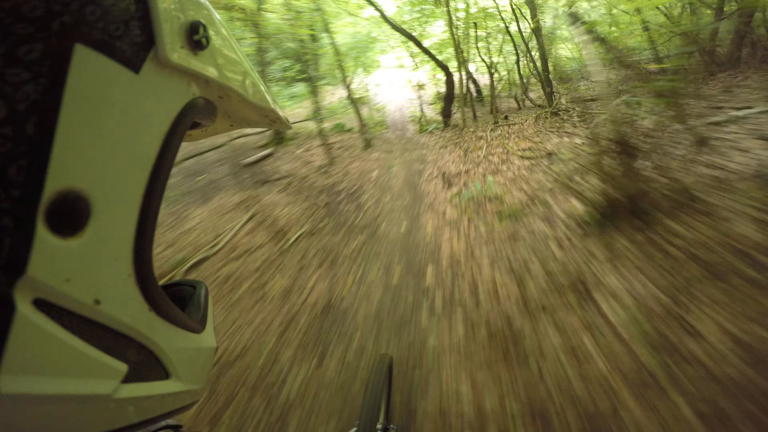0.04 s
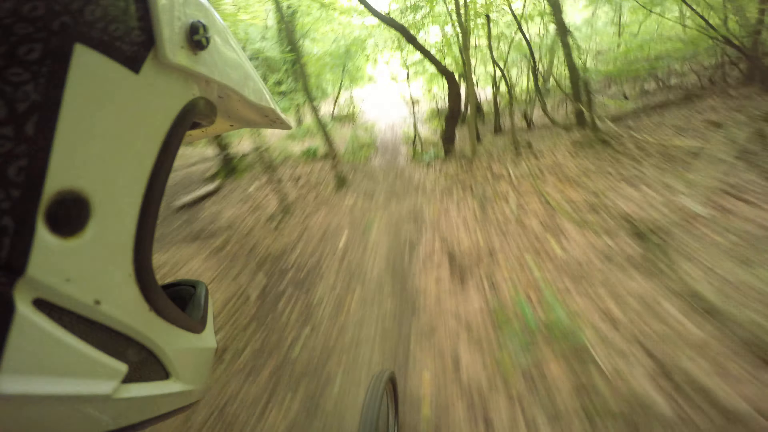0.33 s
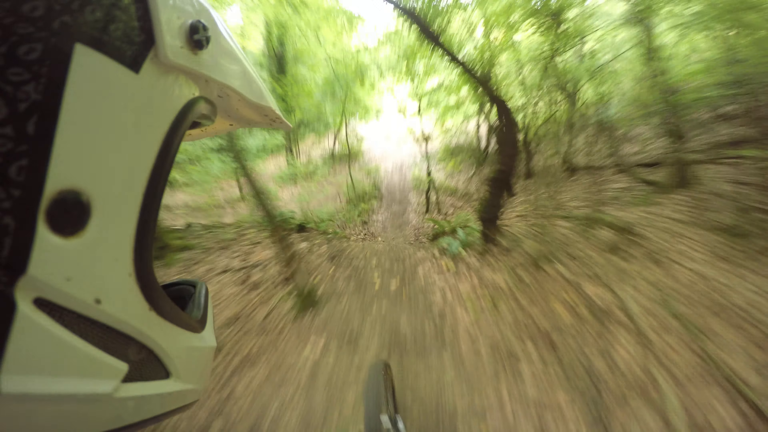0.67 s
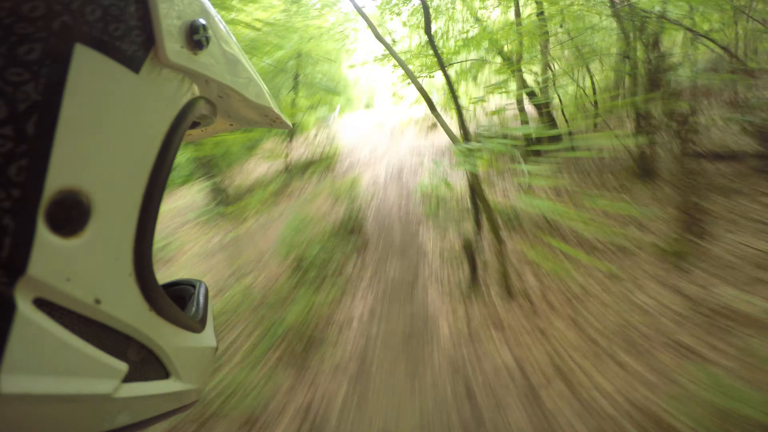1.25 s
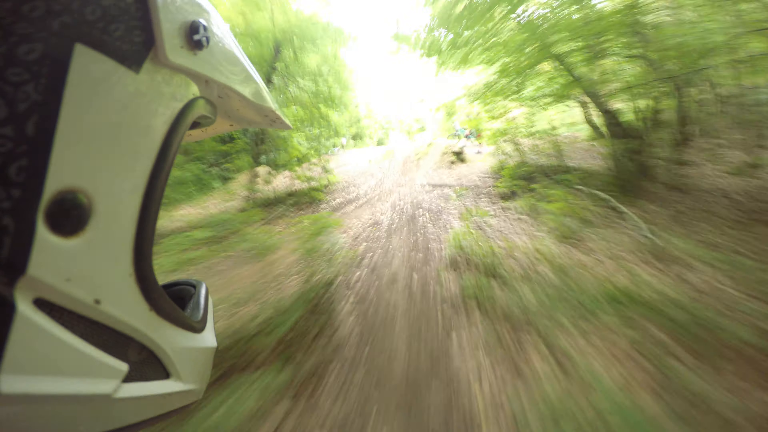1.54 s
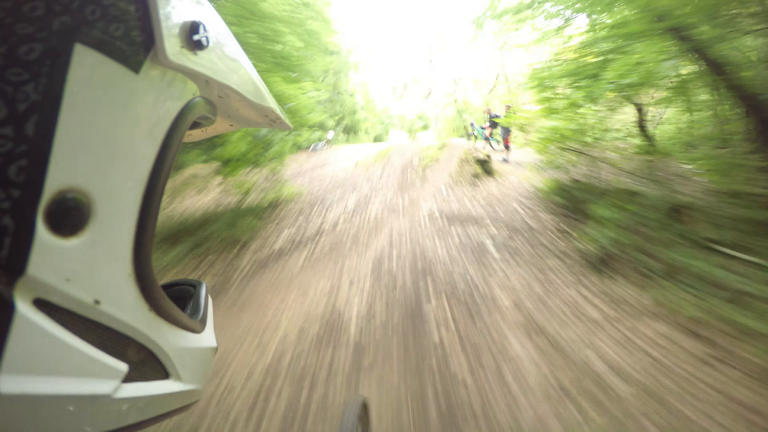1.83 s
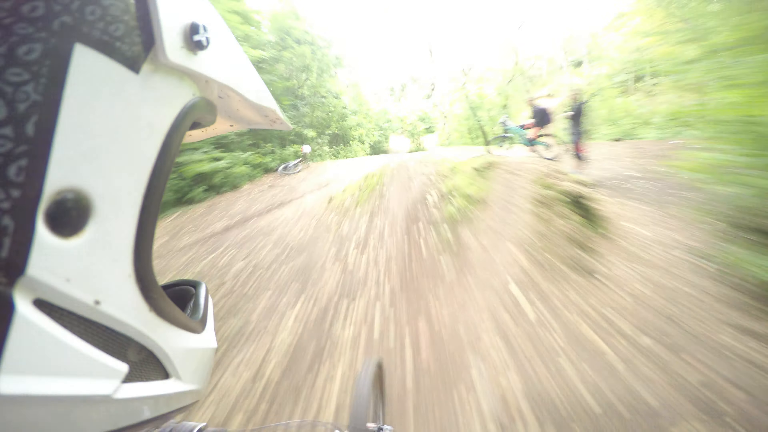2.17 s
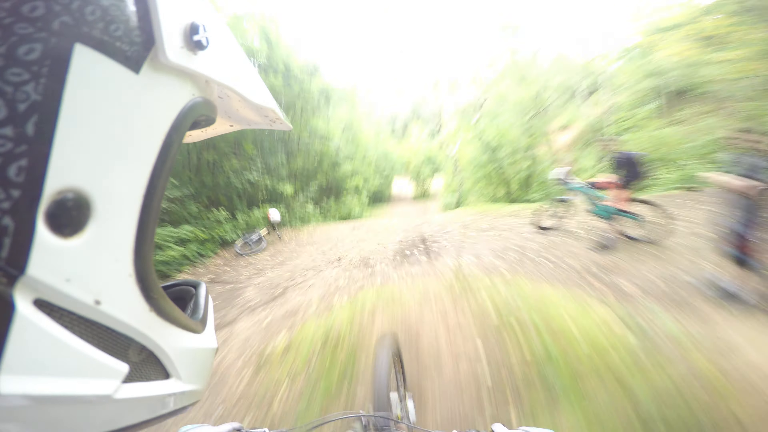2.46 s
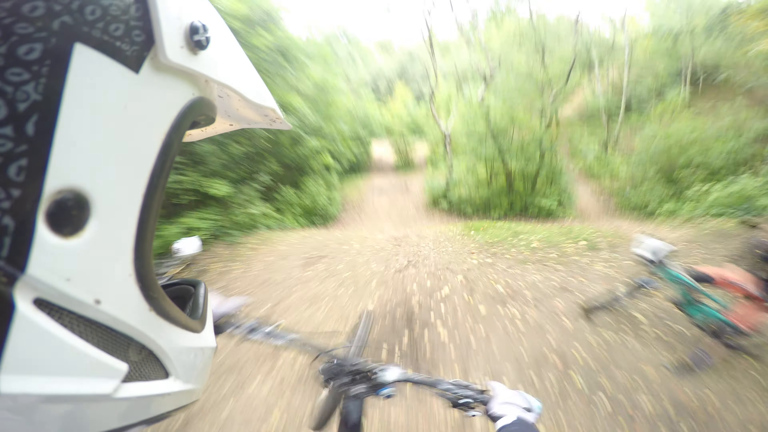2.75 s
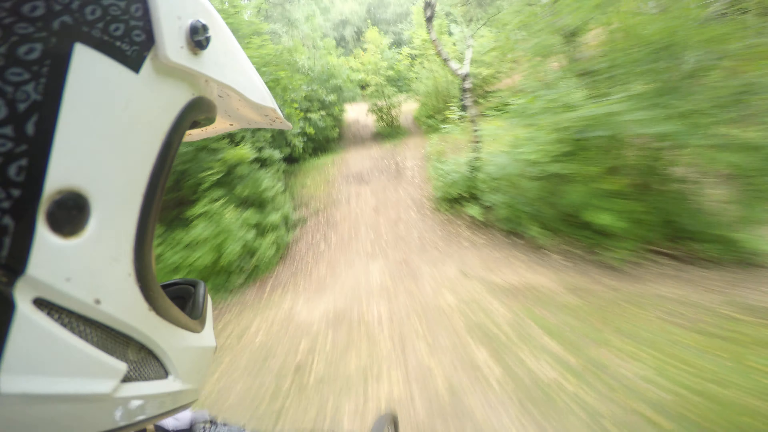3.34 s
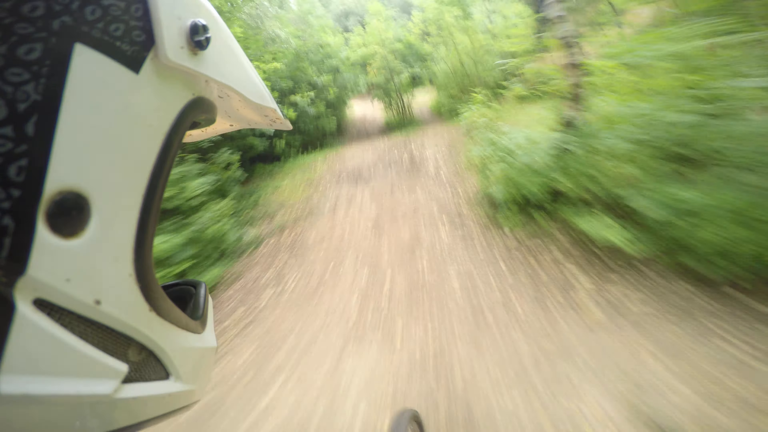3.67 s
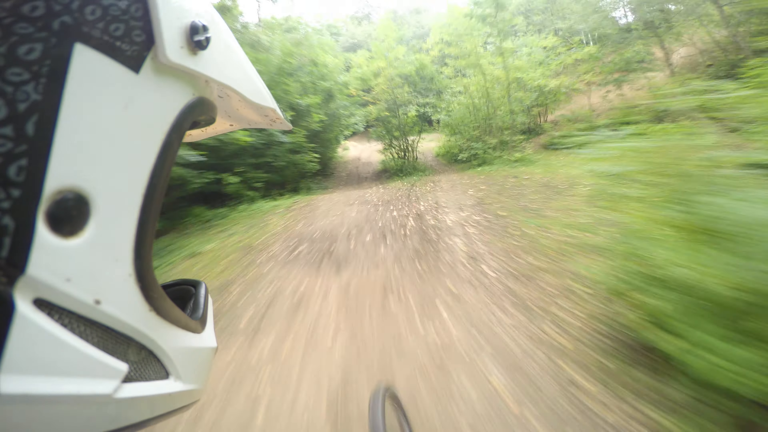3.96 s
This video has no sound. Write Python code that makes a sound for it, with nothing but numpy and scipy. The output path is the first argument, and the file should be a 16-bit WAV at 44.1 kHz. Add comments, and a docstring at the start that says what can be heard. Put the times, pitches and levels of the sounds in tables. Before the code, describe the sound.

Wind buffets the microphone as mountain bike tyres rush over dirt, with knocks and chain rattles.

```python
"""A mountain bike runs fast down a dirt trail, heard from a camera on the rider's helmet.
Wind buffets the camera housing and the tyres rush over the dirt throughout. At once the helmet is jolted
and hard knocks hit the housing. Oil squishes in the dampers, then the tyres slap over bumps and the chain
ticks. From about 2.6 s the chain rattles and the freewheel clicks through a jump. At 3.4 s the bike lands
with a thud and a scuff, and rides on."""
import sys
import numpy as np
from scipy import signal
from scipy.fft import rfft, irfft
from scipy.io import wavfile
from scipy.ndimage import uniform_filter1d

SR = 44100
rng = np.random.default_rng(int(sys.argv[2]) if len(sys.argv) > 2 else 0)


def pcm_store(signal):
    """Save signal as 16-bit PCM."""
    levels = np.round(np.clip(np.atleast_2d(signal), -1, 1) * 32767)
    wavfile.write(sys.argv[1], SR, levels.astype(np.int16).T)


N = 176400
T = np.arange(N) / SR


def from_db(db):
    """Turn decibels into a gain."""
    return 10 ** (np.asarray(db) / 20)


def rms_one(x):
    """Scale a signal so its average strength (rms) is 1."""
    return x / np.sqrt(np.mean(x ** 2) + 1e-20)


def levels(rows):
    """Turn rows of time_s, level_db, ... into one gain curve per level column."""
    times, *columns = np.transpose(rows)
    return [from_db(np.interp(T, times, column)) for column in columns]


def butter(x, hz, kind, order):
    """Keep the "low" or the "high" side of a frequency."""
    return signal.sosfilt(signal.butter(order, hz, kind, fs=SR, output="sos"), x + 1e-18)


def drift(rate_hz):
    """A smooth random wander, about 1 in size."""
    step = 40   # samples between points
    r = np.exp(-2 * np.pi * rate_hz * step / SR)
    slow = signal.lfilter([1], [1, -2 * r, r * r], rng.standard_normal(N // step + 2002))[2000:]
    return np.interp(np.arange(N) / step, np.arange(len(slow)), rms_one(slow))


def coloured(x, spectrum):
    """Shape a sound by rows of pitch_hz, level_db; past the ends it loses 30 dB per octave."""
    hz, db = np.transpose(spectrum)
    octave, known = np.log2(np.arange(N // 2 + 1) * SR / N + 1e-3), np.log2(hz)
    outside = np.abs(octave - np.clip(octave, known[0], known[-1]))
    gain = from_db(np.interp(octave, known, db) - 30 * outside)
    return rms_one(irfft(rfft(x) * gain, N))


def noise(spectrum, flutter_db, rate_hz):
    """Shaped noise whose level flutters."""
    return rms_one(coloured(rng.standard_normal(N), spectrum) * from_db(flutter_db * drift(rate_hz)))


def resonate(x, modes):
    """Pass a sound through side-by-side resonances: pitch_hz, width_hz, level_db."""
    out, power = 0, 0
    for k, (hz, width, db) in enumerate(modes):
        r = np.exp(-np.pi * width / SR)
        feedback = [1, -2 * r * np.cos(2 * np.pi * hz / SR), r * r]
        band = signal.lfilter(np.array([1, 0, -1]) * (1 - r * r) / 2, feedback, x + 1e-18)
        out = out + (-1) ** k * from_db(db) * band
        power += from_db(db) ** 2 * np.pi * width / SR
    return out / np.sqrt(power)


def ring(times, dbs, hz, fade_s):
    """A tone struck at the given times and levels; it dies away by 60 dB in fade_s."""
    clicks = np.zeros(N)
    clicks[(np.asarray(times) * SR).astype(int)] = from_db(dbs)
    r, w = from_db(-60 / (fade_s * SR)), 2 * np.pi * hz / SR
    return signal.lfilter([0, np.sin(w)], [1, -2 * r * np.cos(w), r * r], clicks + 1e-18)


def contacts(rows):
    """A gain that jumps up, holds and dies away for each row: start_s, level_db, hold_s, decay_s."""
    out, age = np.zeros(N + SR), T[:SR // 8]
    for start, db, hold, decay in rows:
        i = int(start * SR)
        out[i:i + len(age)] += from_db(db) * np.exp(-np.maximum(age - hold, 0) / decay)
    return out[:N]


def strikes(rows, click_db=-1):
    """Each contact is one firm click followed by random chatter."""
    out = rng.choice([-1, 1], N) * contacts(rows)
    for start, db, hold, decay in rows:
        out[int(start * SR)] += from_db(db + click_db) * np.sqrt((hold + decay / 2) * SR)
    return out


def swell(start_s, length_s):
    """A rounded rise and fall."""
    progress = np.clip((T - start_s) / length_s, 0, 1)
    return np.sqrt(np.maximum(np.sin(np.pi * progress), 0))


def rough_tone(phase, spread_hz):
    """A tone smeared into a narrow band of noise."""
    a, b = butter(rng.standard_normal((2, N)), spread_hz, "low", order=2)
    return rms_one(a * np.cos(phase) + b * np.sin(phase))


def wind():
    """Wind beats on the housing in low lumps, with a softer rush of air above."""
    # how the buffeting and the air rise and fall: time_s, level_db
    buffet_curve = [(.09,-25),(.5,-33.5),(.59,-42.5),(.68,-30),(.81,-26.5),(1.13,-38),(1.21,-12.5),(1.75,-16),(2.05,-27.5),(2.45,-14.5),(2.76,-16.5),(2.85,-21),(3.56,-29.5),(3.63,-11.5),(4,-14.5)]
    air_curve = [(.2,-55.5),(.5,-70.5),(.8,-58),(1.7,-46.5),(2.9,-53),(3.8,-50.5)]
    # their tone colours: pitch_hz, level_db
    buffet_spectrum = [(16,5),(26,3.5),(46,3),(58,-10.5),(70,-25.5),(105,-27.5),(150,-50)]
    air_spectrum = [(85,0),(112,6.5),(200,-3.5),(450,-11),(700,-12.5),(1200,-18.5)]
    lumps = noise(buffet_spectrum, flutter_db=3.5, rate_hz=7.6)
    lumps /= np.sqrt(uniform_filter1d(lumps ** 2, size=4000))   # even out the slow swings
    air = from_db(5) * noise(air_spectrum, flutter_db=2.5, rate_hz=25)
    return levels(buffet_curve)[0] * lumps + levels(air_curve)[0] * air


def tyres(grains_per_s=910):
    """The tread roars, rushes and hisses on the dirt, and sprays of grit crackle in the hiss."""
    # how the three sounds rise and fall: time_s, roar_db, rush_db, hiss_db
    curves = [(.18,-57.5,-57,-67.5),(.3,-67.5,-67.5,-64.5),(.47,-65.5,-67.5,-76.5),(.8,-55.5,-51,-65),(1.08,-52.5,-51,-67.5),(1.3,-47.5,-44.5,-60.5),(1.58,-43,-43.5,-57.5),(1.77,-43,-38,-52),(2.4,-46.5,-44,-56.5),(2.95,-50,-48,-62.5),(3.38,-48,-47.5,-66.5),(3.53,-39,-48,-65),(3.59,-41,-45.5,-55),(4,-41,-39.5,-53)]
    # their tone colours: pitch_hz, level_db
    roar_spectrum = [(500,-19.5),(750,-13),(950,-6.5),(1500,-3),(2300,-1),(3000,-11)]
    rush_spectrum = [(1500,-22.5),(2100,-9.5),(2700,2.5),(3250,0.5),(3550,-5),(4300,-9),(5500,-23)]
    hiss_spectrum = [(3800,.5),(6900,-1),(7800,-8.5),(10500,-9.5),(15500,-26)]
    hits = rng.random(N) < grains_per_s * from_db(7 * drift(25)) / SR
    grains = hits * rng.choice([-1, 1], N) * from_db(2.5 * np.minimum(rng.exponential(1, N), 5))
    grit = from_db(-2) * coloured(grains, hiss_spectrum)
    roar = from_db(3) * noise(roar_spectrum, flutter_db=1.44, rate_hz=31)
    rush = noise(rush_spectrum, flutter_db=1.6, rate_hz=41)
    hiss = from_db(-0.5) * noise(hiss_spectrum, flutter_db=2, rate_hz=40)
    roar_gain, rush_gain, hiss_gain = levels(curves)
    return roar_gain * roar + rush_gain * rush + hiss_gain * (hiss + grit)


def jolts():
    """Bumps set the helmet's shell swaying and booming."""
    # bumps: start_s, sway_db, boom_db
    bumps = [(0.1896,-2,-12.5),(1.349,-6.5,-40),(3.391,-36.5,-9),(3.42,-2,-38.5)]
    starts, sway_db, boom_db = np.transpose(bumps)
    sway = ring(starts, sway_db, hz=50.7, fade_s=0.23)
    boom = ring(starts, boom_db, hz=107, fade_s=0.24)
    return -butter(sway + boom, 120, "low", order=2)


def knocks(decay_s=0.0012):
    """Each knock strikes the housing, chatters for a few milliseconds and leaves it ringing."""
    # hard knocks: start_s, hold_s, low_db, high_db, crack_db, ring_db
    hits = [(0.1906,0.0031,-5,-9.5,-5,-2.5),(0.2068,0.0011,-16.5,-15,-19,-17.5),(0.2095,0.0065,-12.5,-17.5,-12,-12),(0.2201,.0045,-24.5,-16,-31,-20.5),(.238,0.0018,-11,-21.5,-28,-4)]
    # the housing's resonances: pitch_hz, width_hz, level_db
    low_modes = [(255,90,-2.5),(627,120,-9),(913,130,-1),(1500,300,-1.5),(1990,130,2),(2360,230,2),(2963,270,1.5)]
    high_modes = [(3950,130,-1.5),(4870,160,-3),(5730,220,0),(6020,280,3),(6800,450,-2.5),(9350,320,-5.5)]
    # its lingering tones: pitch_hz, level_db, fade_s
    tones = [(177,-13.5,.06),(632,-18.5,0.069),(1810,-30,.16),(2060,-33,0.086),(2770,-28,0.083),(4070,-34.5,.065)]
    starts, holds, low_db, high_db, crack_db, ring_db = np.transpose(hits)
    def chatter(dbs):
        return strikes([(start, db, hold, decay_s) for start, db, hold in zip(starts, dbs, holds)])
    body = resonate(chatter(low_db), low_modes) + resonate(chatter(high_db), high_modes)
    crack = butter(chatter(crack_db), 9700, "low", order=1)
    tail = sum(ring(starts, ring_db + db, hz, fade_s) for hz, db, fade_s in tones)
    return body + crack + tail


def slip(start_s=.2095, length_s=.008):
    """One knock slips along the housing with a rising squawk."""
    pitch_hz = np.interp(T, [start_s, start_s + length_s], [1600, 2980])
    return from_db(-6.5) * swell(start_s, length_s) * np.sin(2 * np.pi * np.cumsum(pitch_hz) / SR)


def dampers(swing=0.061, period_s=0.068, sag_per_s=0.4, spread_hz=170):
    """Oil squeezes through the pumping dampers: a broken rasp and a whistle that wavers and sinks."""
    # squishes: start_s, length_s, pitch_hz (before swing and sag), level_db
    squishes = [(0.719,0.16,4320,-48.5),(1.671,0.053,4700,-48.5),(2.599,0.053,4600,-44),(2.665,0.084,4250,-46.5)]
    # the whistle's first three harmonics: level_db
    harmonics = [0.5,-13.5,-24.5]
    # the rasp's tone colour: pitch_hz, level_db
    rasp_spectrum = [(3000,12),(6200,0.5),(7300,-20),(15000,-11.5)]
    gain, hz = np.zeros(N), np.zeros(N)
    for start, length, pitch_hz, db in squishes:
        age = T - start
        gain += from_db(db) * swell(start, length)
        bend = 1 - swing * np.cos(2 * np.pi * age / period_s) - sag_per_s * np.minimum(age, length)
        hz = np.where(age >= 0, pitch_hz * bend, hz)
    phase = 2 * np.pi * np.cumsum(hz) / SR
    whistle = sum(from_db(db) * rough_tone(k * phase, k * spread_hz) for k, db in enumerate(harmonics, 1))
    flicker = rms_one(from_db(3 * drift(150)))
    rasp = from_db(-1.5) * coloured(rng.standard_normal(N), rasp_spectrum)
    return gain * flicker * (whistle + rasp)


def scuffs():
    """The tread scuffs over bumps and buzzes as it bites after the landing."""
    # scrapes of the tread: start_s, length_s, pitch_hz, width_hz, level_db
    scrapes = [(1.341,0.027,1880,300,-36.5),(1.442,0.018,1850,700,-38.5),(1.48,0.021,1750,500,-34.5),(1.565,0.028,1850,600,-39),(3.492,0.084,930,60,-38.5),(3.548,0.039,1990,111,-30.5)]
    return sum(from_db(db) * swell(start, length) * rough_tone(2 * np.pi * hz * T, width / 2)
               for start, length, hz, width, db in scrapes)


def thuds(decay_s=0.0046):
    """The tyres hit the ground with hollow slaps."""
    # hits on the ground: start_s, level_db
    hits = [(1.348,-33),(3.3842,-23.5),(3.3899,-23),(3.758,-34.5)]
    # the tyre's hollow resonances: pitch_hz, width_hz, level_db
    modes = [(915,270,-1),(1510,250,-1),(2000,330,-5.5)]
    slaps = strikes([(start, db, 0, decay_s) for start, db in hits])
    return butter(resonate(slaps, modes), 3000, "low", order=4)


def chain_ticks(decay_s=0.0031, gain_db=-3.5):
    """The chain ticks in tiny, bright bursts of noise."""
    # ticks: start_s, level_db
    ticks = [(1.368,-43.5),(1.459,-39),(1.5245,-40.5),(1.56,-42),(1.6069,-43),(1.8069,-40),(2.21,-42),(3.629,-39.5),(3.702,-40),(3.8017,-35.5),(3.874,-35)]
    # their resonances: pitch_hz, width_hz, level_db
    modes = [(5860,1300,-1.4),(10000,570,1),(12400,810,0.025)]
    bursts = contacts([(start, db + gain_db, 0, decay_s) for start, db in ticks])
    return resonate(bursts * rng.standard_normal(N), modes)


def drivetrain(clicks_per_s=75.54, loudest_s=2.85, hub_hz=3180, decay_s=0.0029):
    """In the air the chain rattles and the freewheel clicks beneath it; both make the hub ring."""
    # rattles: start_s, level_db
    rattles = [(2.5778,-31),(2.6112,-27),(2.7125,-29),(2.8791,-23),(3.124,-37),(3.1714,-36),(3.2213,-32.5)]
    # their resonances: pitch_hz, width_hz, level_db
    modes = [(2670,356,3.5),(3240,193,7.5),(3790,360,-3.5),(6050,2160,-16.5)]
    freewheel_s = np.arange(0, N / SR, 1 / clicks_per_s)
    arch_db = -34 - 4 * ((freewheel_s - loudest_s) / 0.33) ** 2   # fades in, then out
    freewheel_db = arch_db + rng.normal(0, 4.3, len(freewheel_s))
    clicks = [*rattles, *zip(freewheel_s, freewheel_db)]
    bursts = contacts([(start, db - 0.5, 0, decay_s) for start, db in clicks])
    rattle = resonate(bursts * rng.standard_normal(N), modes)
    hub = ring(*np.transpose(clicks), hub_hz, fade_s=0.016)
    return rattle + butter(hub, hub_hz / 2, "high", order=2)


def scene():
    """All the sounds meet at one microphone."""
    mix = wind() + tyres() + jolts() + knocks() + slip() + dampers()
    return (mix + scuffs() + thuds() + chain_ticks() + drivetrain())[None]


def record(dry, start_s=.089, top_hz=15400):
    """The sound cuts in, the knocks overload, and the treble ends steeply."""
    fade_in = np.clip((T - start_s) * 1000, 0, 1)
    clipped = np.clip(dry * fade_in, -1, 1)
    return signal.sosfilt(signal.ellip(10, .2, 70, top_hz, fs=SR, output="sos"), clipped)


dry = scene()
out = record(dry)
pcm_store(out)
```